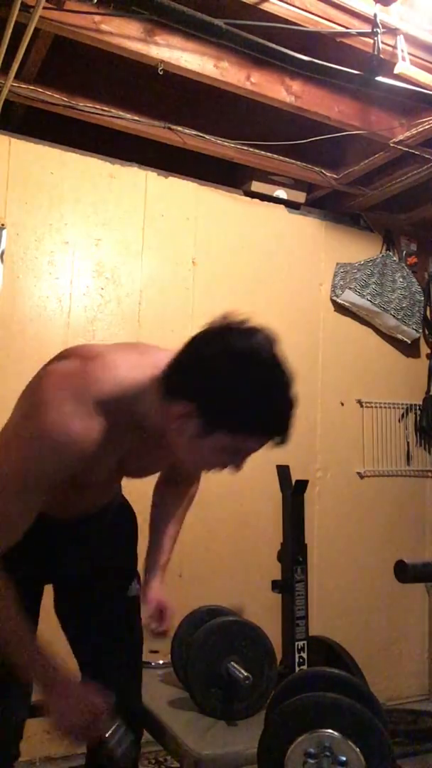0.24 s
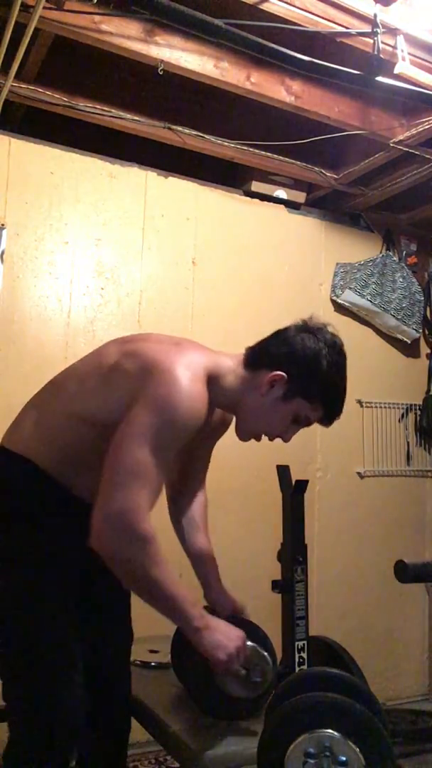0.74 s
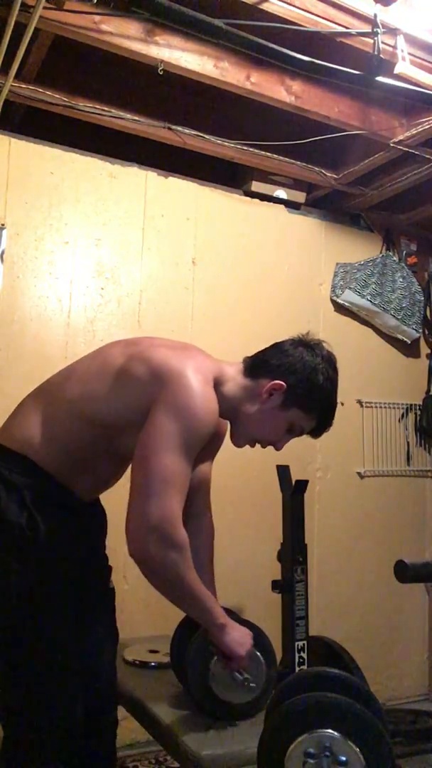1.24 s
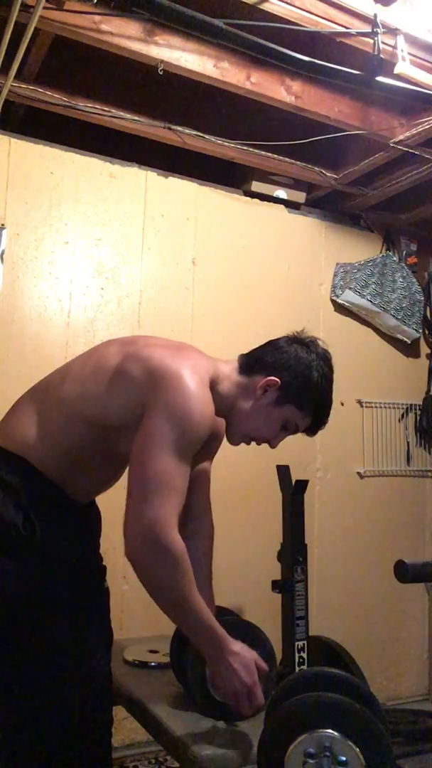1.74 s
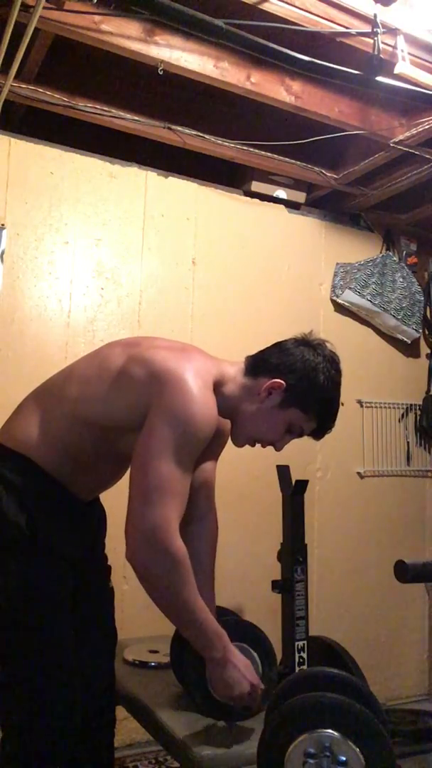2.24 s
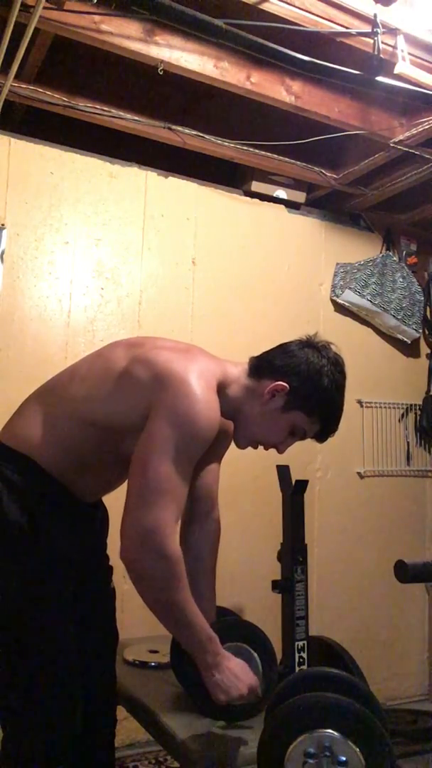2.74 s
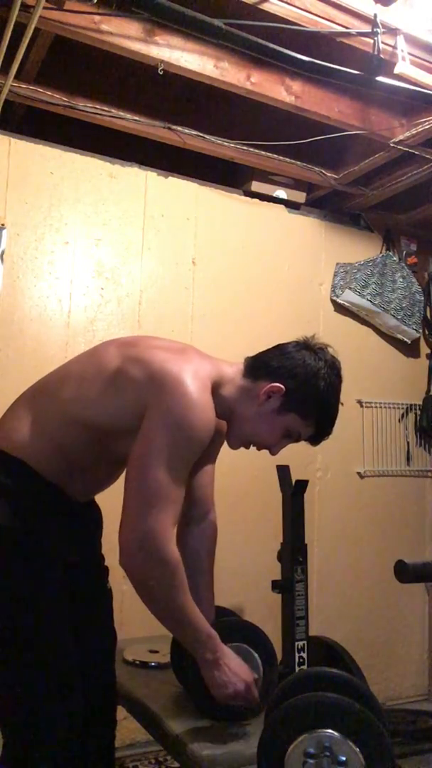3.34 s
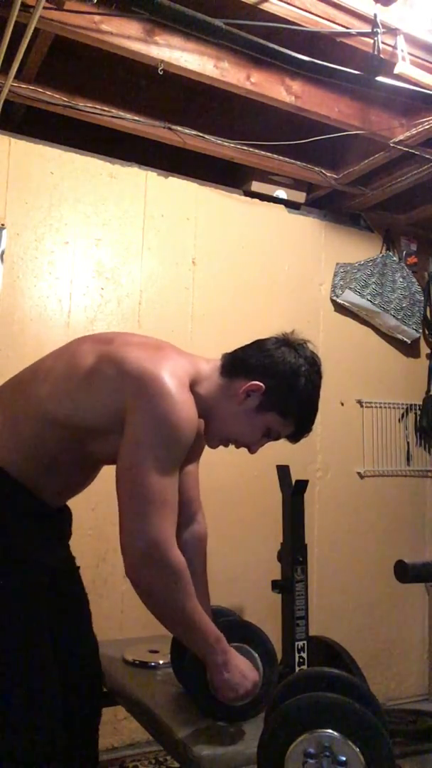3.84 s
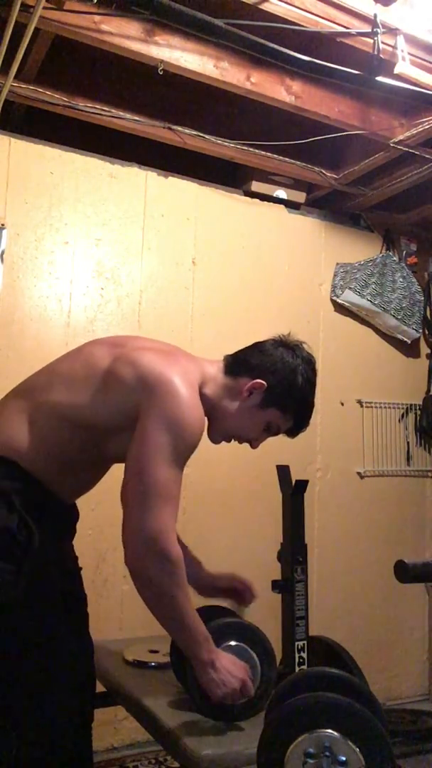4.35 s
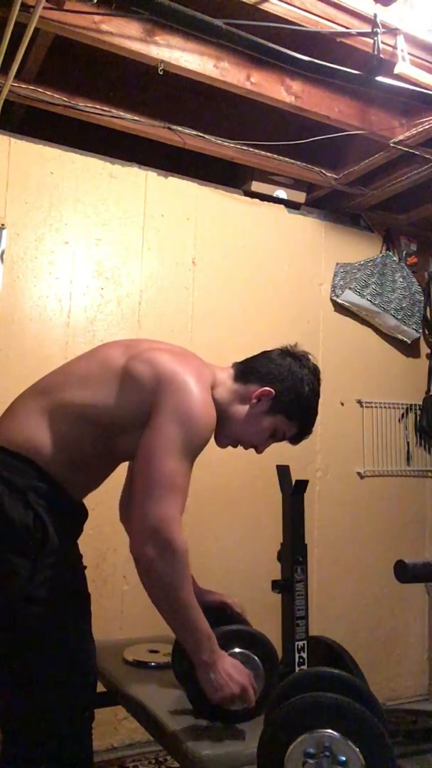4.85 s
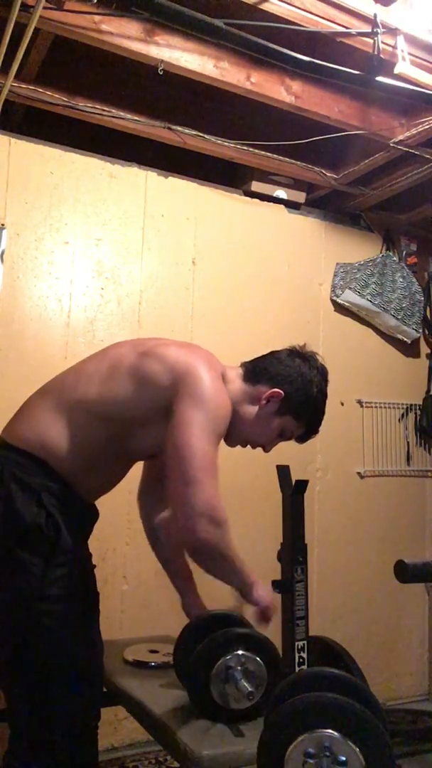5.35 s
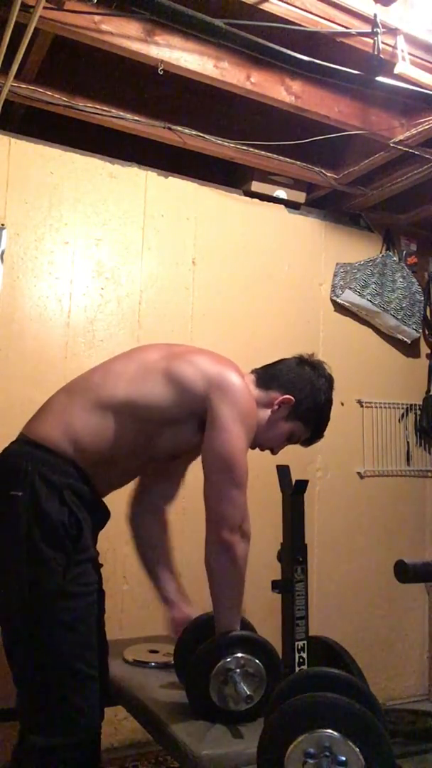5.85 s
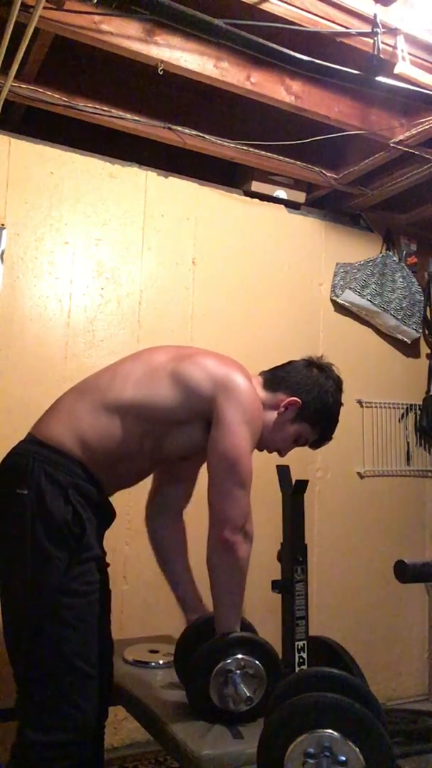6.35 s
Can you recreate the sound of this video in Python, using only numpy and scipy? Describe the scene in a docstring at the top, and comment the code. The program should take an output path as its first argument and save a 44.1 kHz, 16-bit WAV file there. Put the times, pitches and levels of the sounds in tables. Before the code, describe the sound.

A steel collar clanks onto a dumbbell bar, rattles along the thread, and iron plates knock over a low ventilation rumble.

```python
"""A steel spin-lock collar clanks onto the end of a dumbbell bar, and both ring in a small basement gym.
The collar rattles and scrapes along the thread, then is spun home against the iron plates, which knock
as the dumbbell is turned. Each hit is a crack of noise plus the metal's ringing modes; the scrape is
a stream of tiny slips of steel on steel. A low ventilation rumble fills the room throughout."""
import sys
import numpy as np
from scipy import signal
from scipy.fft import rfft, irfft, next_fast_len
from scipy.io import wavfile
from scipy.ndimage import map_coordinates

SR = 44100
rng = np.random.default_rng(int(sys.argv[2]) if len(sys.argv) > 2 else 0)


def to_wav(sig):
    """Store sig (one row per channel, or 1-D mono) as 16-bit WAV at the path in sys.argv[1].

    Samples outside -1..1 are clipped; the rate is SR.
    """
    pcm = np.clip(np.atleast_2d(sig), -1, 1) * 32767
    pcm = np.round(pcm).astype(np.int16)
    wavfile.write(sys.argv[1], SR, pcm.T)  # frames by channels


N = 291015

# Table levels are relative. Knock is a hit's body, crack its top end; spot runs from 0 (face) to 1 (rim).
# collar striking the bar: (t/s, knock/dB, crack/dB, collar ring/dB, bar ring/dB, spot)
CLANKS = [(0.864, -25.5, -56.5, -28.5, -45, 0), (1.199, -26.5, -54, -28.5, -36, 0.7),
          (1.299, -25, -58, -30.5, -35.5, 0.45), (1.395, -20.5, -59.5, -28.5, -40, 0.31),
          (1.432, -36, -60, -33, -45, 0.086), (1.442, -42, -64.5, -23.5, -41, 0.26),
          (1.462, -40, -64.5, -30.5, -35, 0.18), (1.519, -25, -54.5, -22, -23, 0.33),
          (1.528, -29, -55.5, -14.5, -21.5, 0.041), (1.584, -28, -59, -24.5, -32.5, 0.21),
          (1.622, -43, -57.5, -30.5, -36.5, 0.23), (4.873, -39.5, -68.5, -40, -56, 0.26),
          (4.927, -37.5, -61, -32.5, -62, 0), (4.949, -36.5, -46.5, -28.5, -39, 0.43),
          (4.997, -34.5, -54, -29.5, -36, 0.51), (5.012, -27.5, -34, -23, -19, 0.15)]
# collar catching on the thread: (t/s, knock/dB, crack/dB, spot)
CATCHES = [(1.912, -29, -47.5, 0.11), (2.168, -29.5, -53.5, 0.23), (2.516, -33, -59.5, 0.7),
           (2.763, -30, -58, 0.071), (2.813, -26, -60, 0.11), (2.828, -37.5, -61, 0.07),
           (3.114, -26.5, -50.5, 0.063), (3.162, -28, -57.5, 0.76), (3.205, -24.5, -56.5, 0.69),
           (3.257, -31.5, -52.5, 0.46), (3.334, -34, -60.5, 0.94), (3.468, -30, -53, 0.23),
           (3.538, -27.5, -47.5, 0.41), (3.868, -25, -53, 0.36), (3.93, -34.5, -56.5, 0.77),
           (3.972, -43, -51, 0.64), (4.138, -34.5, -66, 0.83), (4.263, -42.5, -66, 0.53),
           (4.286, -38, -59, 0.69), (4.593, -35, -50.5, 0.081), (4.658, -38, -60, 0.35)]
# plates shifting on the handle: (t/s, knock/dB, crack/dB, ring/dB, spot)
KNOCKS = [(4.798, -37.5, -65.5, -54, 0.91), (5.012, -55, -63, -38, 0.46), (5.392, -44.5, -78.5, -70, 0.14),
          (5.607, -47.5, -64, -51, 0.79), (5.63, -43, -63, -55, 0.85), (5.722, -43.5, -90, -52, 0.15),
          (5.947, -32.5, -53, -64, 1), (5.995, -28, -42, -59.5, 0), (6.104, -40, -61.5, -58, 0.21),
          (6.577, -33.5, -32.5, -42, 0.29), (6.585, -25, -47, -40.5, 0.36)]
# turns of the hand, steel sliding on steel: (start/s, end/s, rub/dB, grit/dB)
TURNS = [(1.15, 1.236, -52.5, -58.5), (1.204, 1.416, -45.5, -39.5), (2.09, 2.431, -60, -81.5),
         (2.83, 3.036, -51, -52), (3.18, 3.353, -50.5, -48.5), (3.594, 3.787, -60.5, -80.5),
         (3.927, 4.263, -51.5, -91), (4.417, 5.192, -66, -63), (5.685, 5.715, -60, -67),
         (6.017, 6.131, -53, -67), (6.27, 6.605, -60.5, -69.5)]

# ringing modes: (f/Hz, level/dB, t60/s)
COLLAR_MODES = [(1926, 0, .34), (3575, -11, .2), (3653, 0, .36), (4394, -13, .28), (5858, -1, .24),
                (5913, -4, .27), (8500, 2, .28), (11780, -2, .23), (14140, 0, .18), (15360, -14, .14)]  # free collar
GRIPPED_MODES = [(715, -19, .2), (1325, -8, 0.2), (1385, -6, .2), (1923, -14, .35), (2860, 0, 0.11),
                 (3065, 3, 0.09), (3665, -10, 0.24), (4400, -1, 0.055), (5950, -1, .05), (6800, 0, 0.04),
                 (10120, 1.5, 0.11), (15200, -12, .07)]  # collar damped by the hand
BAR_MODES = [(650, -14, .14), (1594, -18, .3), (2180, -15, .2), (2370, -15, .22), (3075, 0, .22),
             (3293, -11, .17), (3465, -11, .17), (3820, -4, .16), (4130, -12, .12), (4330, -13, .14),
             (4500, -14, .18), (5970, -13, .22), (6490, -16, .18), (6720, -14, .18), (7437, -16, .17),
             (8625, -16, .17)]  # loaded bar
TIP_MODES = [(2880, -1, .11), (3075, -5, .13), (4010, -6, .1), (4210, -4, .1), (4420, -10, .12),
             (9380, -22, .15), (11420, -23, .2)]  # bar tip, steadied by hand until the collar is on
PLATE_MODES = [(1739, 5.5, 0.55), (2420, -7, 1.1), (3973, 5, 0.089), (4280, 2, .05), (6600, -9, 0.078),
               (10710, -2, 0.24)]  # iron plates

# tone of the ring for a hit on the face, and what a hit on the rim adds to it: (f/Hz, level/dB)
COLLAR_FACE = [(1920, -7.5), (3650, 1), (5880, -21), (8500, -19.5), (11750, -34)]
COLLAR_RIM = [(1920, 7), (3650, -18.5), (5880, 29.5), (8500, -15.5), (11750, 10.5), (14140, -12.5)]
GRIPPED_FACE = [(1400, 0.5), (3000, 11), (10100, -15.5)]
GRIPPED_RIM = [(1400, 17.5), (3000, -25), (10100, 26.5)]
PLATE_FACE = [(1740, 6.5), (2500, 5), (3970, -20), (10700, -0.5)]
PLATE_RIM = [(1740, -29), (2500, -37.5), (3970, 29.5), (10700, -11)]
# harder hits ring brighter: (f/Hz, boost/dB per dB of crack)
HARDNESS = [(3600, 0), (8500, 0.57)]

# tone curves: (f/Hz, level/dB)
FINGER_MUTE = [(1920, -21.5), (3000, -6.5)]  # fingers mute the collar, its lowest mode most
CONTACT_EQ = [(80, -26.5), (400, -9), (680, -5.5), (1000, -9), (1500, -3.5), (2200, -6), (2900, 4.5),
              (4250, 3.5), (5000, 0), (6700, 8), (8000, -3), (9500, -2), (13000, -19), (16000, -34)]  # steel hitting steel
RUB_EQ = [(120, -20.5), (400, -7), (750, -2), (1380, -1), (2200, -12.5), (3000, -15), (5000, -31),
          (16000, -67.5)]  # dull body of the scrape
GRIT_EQ = [(600, -25), (2000, 11.5), (3000, 20), (4600, 3.5), (6900, -0.5), (8500, -12.5), (11500, -8.5),
           (15000, -50)]  # its sharp edge
SLIP_EQ = [(1400, 1.5), (1900, 1), (3000, -12), (10100, -22.5)]  # soft slips reach mostly the low modes
AIR_EQ = [(22, -52.5), (48, -12.5), (66, 1), (80, -2.5), (98, 3), (118, -10.5), (150, 5.5), (185, -4.5),
          (220, -11.5), (450, -23), (1200, -29), (4000, -43.5), (11000, -45.5), (16000, -54)]  # room air and ventilation
# fan tones: (f/Hz, level/dB)
FAN_TONES = [(68.5, -58.5), (146.5, -66)]
# basement reverb: (f/Hz, t60/s)
ROOM_DECAY = [(250, 0.56), (800, 0.35), (2000, 0.28), (5500, 0.19), (13000, 0.14)]

ON_BAR_S, SEATED_S, PLATES_HELD_S = 1.35, 5.0, 5.3  # collar on the bar, collar tight, hand on the plates
GRIP_DB_PER_S, SEATED_DB_PER_S, HELD_DB_PER_S = 11.5, 221, 134.5  # damping: grip, tight fit, resting hand
HEAVY_DB, CHOKE_DB_PER_S = -30, 19  # extra damping for each dB of ring above HEAVY_DB
USUAL_CRACK_DB = -56.5
GRAZE_LEAD_S, GRAZE_DB, GRAZE_MAX_DB = 0.0057, -16, -11  # usual and highest level, relative to the hit
TURN_RISE_DB_PER_S, TURN_FALL_DB_PER_S, GRIT_ARCH_DB = 231, 74.5, 3.5
TOP_HZ = 16000


def collar_clanks():
    """The collar hits the bar and both ring; a heavy blow presses it tight and dies sooner."""
    times, knock_db, crack_db, ring_db, bar_db, spot = np.transpose(CLANKS)
    damping = GRIP_DB_PER_S + CHOKE_DB_PER_S * np.maximum(ring_db - HEAVY_DB, 0)
    collar_damping = damping + SEATED_DB_PER_S * (times > SEATED_S)
    held = times < ON_BAR_S
    mute_db = np.outer(held, curve_at(FINGER_MUTE, np.transpose(COLLAR_MODES)[0]))
    drive_db = mode_drive(COLLAR_MODES, ring_db, crack_db, spot, COLLAR_FACE, COLLAR_RIM) + mute_db
    collar = ringing(times, drive_db, COLLAR_MODES, collar_damping, room_db=-7)
    tip = ringing(times[held], bar_db[held], TIP_MODES, damping[held], room_db=4)
    bar = ringing(times[~held], bar_db[~held], BAR_MODES, damping[~held], room_db=-6)
    hits = zip(times, knock_db, crack_db)
    attack = cracks(hits, gain_db=20.5, t60=0.016, room_db=-4, bounce_db=-9.5, rise_s=0.0003)
    return attack + amp(4) * collar + tip + bar


def thread_rattle():
    """Held in the fingers, the collar catches on the thread: a snap and a short ring each time."""
    times, knock_db, crack_db, spot = np.transpose(CATCHES)
    drive_db = mode_drive(GRIPPED_MODES, crack_db, crack_db, spot, GRIPPED_FACE, GRIPPED_RIM)
    ring = ringing(times, drive_db, GRIPPED_MODES, np.zeros(len(times)), room_db=-1, detune=0.004)
    hits = with_grazes(times, knock_db, crack_db)
    snaps = cracks(hits, gain_db=14.5, t60=0.011, room_db=1.5, bounce_db=-9.5, rise_s=0.0009)
    return amp(4) * snaps + amp(2) * ring


def plate_knocks():
    """The iron plates jostle on the handle; their ring shortens once a hand rests on them."""
    times, knock_db, crack_db, ring_db, spot = np.transpose(KNOCKS)
    drive_db = mode_drive(PLATE_MODES, ring_db, crack_db, spot, PLATE_FACE, PLATE_RIM)
    ring = ringing(times, drive_db, PLATE_MODES, HELD_DB_PER_S * (times > PLATES_HELD_S), room_db=-1)
    hits = with_grazes(times, knock_db, crack_db)
    return ring + cracks(hits, gain_db=15, t60=0.018, room_db=3, bounce_db=-5, rise_s=0.0019)


def cracks(hits, gain_db, t60, room_db, bounce_db, rise_s):
    """The attack of each hit: a noise burst, dull or bright, with four quick bounces and reverb."""
    track, t = np.zeros(N), np.arange(SR // 8) / SR
    for start, knock_db, crack_db in hits:
        since_bounce = t - np.cumsum(rng.uniform(0.005, 0.022, size=4))[:, None]
        bounces = np.sum((since_bounce > 0) * amp(-60 * abs(since_bounce) / t60), axis=0)
        decay = amp(-60 * t / t60) + amp(bounce_db - 340 * t) * bounces
        burst = rng.standard_normal(len(t)) * amp(gain_db) * decay * (1 - np.exp(-t / rise_s))
        crack = equalise(burst, CONTACT_EQ, [(1600, knock_db), (6500, crack_db)])
        add(track, start, crack)
        add(track, start, amp(room_db) * signal.fftconvolve(crack, room_tail()))
    return track


def with_grazes(times, knock_db, crack_db):
    """Lead into each hit with a graze as the steel starts to slip; soft hits graze most."""
    graze_db = np.minimum(GRAZE_DB + USUAL_CRACK_DB - crack_db, GRAZE_MAX_DB)
    hits = np.transpose([times, knock_db, crack_db])
    grazes = np.transpose([times - GRAZE_LEAD_S, knock_db + graze_db, crack_db + graze_db])
    return np.concatenate([hits, grazes])


def mode_drive(modes, ring_db, crack_db, spot, face, rim):
    """Drive in dB for each hit (rows) and mode (columns), set by where and how hard the hit lands."""
    hz = np.transpose(modes)[0]
    spot_db = curve_at(face, hz) + np.outer(np.clip(spot, 0, 1), curve_at(rim, hz))
    hardness_db = np.outer(crack_db - USUAL_CRACK_DB, curve_at(HARDNESS, hz))
    return ring_db[:, None] + spot_db + hardness_db


def ringing(times, drive_db, modes, damping_db_per_s, room_db, detune=0.00048):
    """Each hit sets the modes ringing into the room; the next chokes that ring and starts its own."""
    track, t = np.zeros(N), np.arange(2 * SR // 3) / SR
    hz, mode_db, t60 = np.transpose(modes)
    gaps = np.diff(times, append=N / SR + 1)
    for start, gap, hit_db, damping in zip(times, gaps, drive_db, damping_db_per_s):
        pitch = hz * (1 + detune * rng.standard_normal(len(hz)))  # the grip detunes the modes slightly
        phase = 2 * np.pi * (pitch[:, None] * t + rng.random((len(hz), 1)))
        knots = rng.standard_normal((len(hz), SR // 512))
        rocking = np.array([np.interp(t * 90, np.arange(len(row)), row) for row in knots])
        phase += 0.85 * rocking  # the loose part rocks on the bar, which roughens each mode
        ring = amp(mode_db + hit_db) @ (amp(-60 * t / t60[:, None]) * np.sin(phase))
        attack = (1 - np.exp(-t / 0.00039)) ** 2
        choke = np.exp(-np.maximum(t - gap, 0) / 0.00079)
        ring *= attack * amp(-damping * t) * choke
        add(track, start, ring)
        add(track, start, amp(room_db) * signal.fftconvolve(ring, room_tail()))
    return track


def scrape():
    """Turning steel rubs and sheds sharp slips that ring the collar, later the plates' upper modes."""
    t = np.arange(N) / SR
    seeking = (t > TURNS[0][0]) & (t < CLANKS[1][0])  # the rim feels for the bar end
    on_thread, seated = t > CATCHES[0][0], t > SEATED_S
    pressure, grittiness = hand_turns()
    unevenness = amp(3 * wobble(40))
    rub = unit_rms(equalise(slips(600) * unevenness, RUB_EQ)) * pressure * amp(2)
    grit = unit_rms(equalise(slips(700), GRIT_EQ)) * grittiness * amp(-5)
    chatter = unit_rms(slips(80)) * pressure * amp(-3.5)
    collar = resonate(chatter * (on_thread & ~seated), GRIPPED_MODES)
    plates = resonate(chatter * seated, PLATE_MODES[4:]) * amp(-16.5)
    singing_rim = resonate(unit_rms(slips(700)) * pressure * seeking, COLLAR_MODES[4:6])
    direct = rub + grit + singing_rim + collar + plates
    return 0.54 * direct + 0.52 * signal.fftconvolve(direct, room_tail())[:N]


def hand_turns():
    """Rub and grit envelopes: each turn swells, holds and dies away, and is grittiest halfway."""
    t, rub, grit = np.arange(N) / SR, np.zeros(N), np.zeros(N)
    for start, end, rub_db, grit_db in TURNS:
        progress = np.clip((t - start) / (end - start), 0, 1)
        fade_db = -TURN_RISE_DB_PER_S * np.maximum(start - t, 0)
        fade_db -= TURN_FALL_DB_PER_S * np.maximum(t - end, 0)
        rub += amp(rub_db + fade_db)
        grit += amp(grit_db + fade_db - GRIT_ARCH_DB * (2 * progress - 1) ** 2)
    return rub, grit


def slips(per_s):
    """Tiny slips of steel on steel: clicks of random size at random times."""
    return rng.standard_normal(N) * (rng.random(N) < per_s / SR)


def resonate(clicks, modes):
    """A stream of slips rings the modes through an impulse response of energy 1."""
    t = np.arange(SR // 3) / SR
    response = sum(amp(db + curve_at(SLIP_EQ, hz) - 60 * t / t60) * np.sin(2 * np.pi * hz * t)
                   for hz, db, t60 in modes)
    return signal.fftconvolve(clicks, response / np.linalg.norm(response))[:N]


def room_tail():
    """The basement's diffuse reverb, energy 1; the highs die first."""
    hz, t, noise = signal.stft(rng.standard_normal(SR // 2), SR, nperseg=256)
    decay = amp(-60 * t / curve_at(ROOM_DECAY, hz)[:, None])
    tail = signal.istft(noise * decay, SR, nperseg=256)[1]
    tail = np.pad(tail, (SR // 400, 0))  # pre-delay from the nearest surfaces
    return tail / np.linalg.norm(tail)


def ventilation():
    """The bed: a steady rumble of air with two wavering fan tones."""
    t, hum = np.arange(N) / SR, np.zeros(N)
    for hz, db in FAN_TONES:
        peak = np.sqrt(2) * amp(db + 2.5 * wobble(1))
        hum += peak * np.sin(2 * np.pi * hz * t + 0.8 * wobble(6.3))
    return amp(-52) * unit_rms(equalise(rng.standard_normal(N), AIR_EQ)) + hum


def amp(db):
    """Decibels to gain."""
    return 10 ** (np.asarray(db) / 20)


def unit_rms(x):
    """Scale to rms 1."""
    return x / np.sqrt(np.mean(x ** 2) + 1e-20)


def curve_at(points, hz):
    """Read (f/Hz, value) points on a log frequency axis."""
    freqs, values = np.transpose(points)
    return np.interp(np.log(hz + 1), np.log(freqs + 1), values)


def equalise(x, *curves):
    """Minimum-phase EQ by stacked (f/Hz, level/dB) curves, so nothing rings ahead of an attack."""
    size = 2 * next_fast_len(len(x) // 2 + 1)
    hz = np.fft.rfftfreq(size, 1 / SR)
    gain = amp(sum(curve_at(curve, hz) for curve in curves))
    cepstrum = irfft(np.log(gain), size)
    cepstrum[1:size // 2] *= 2
    cepstrum[size // 2 + 1:] = 0
    return irfft(rfft(x, size) * np.exp(rfft(cepstrum)), size)[:len(x)]


def wobble(knots_per_s):
    """A smooth random modulation curve."""
    knots = rng.standard_normal(int(N * knots_per_s / SR) + 4)
    return map_coordinates(knots, [np.arange(N) * knots_per_s / SR])


def add(track, start_s, sound):
    """Mix a sound into the track at its cue."""
    start = round(start_s * SR)
    part = sound[:N - start]
    track[start:start + len(part)] += part


def scene():
    """Clanks, rattle, knocks and scrape over the ventilation bed, in mono."""
    return (collar_clanks() + thread_rattle() + plate_knocks() + scrape() + ventilation())[None]


def record(dry):
    """A brick-wall low-pass cuts everything above TOP_HZ."""
    size = next_fast_len(N + SR // 2)
    passband = np.fft.rfftfreq(size, 1 / SR) < TOP_HZ
    return irfft(rfft(dry, size) * passband, size)[:, :N]


dry = scene()
out = record(dry)
to_wav(out)
```